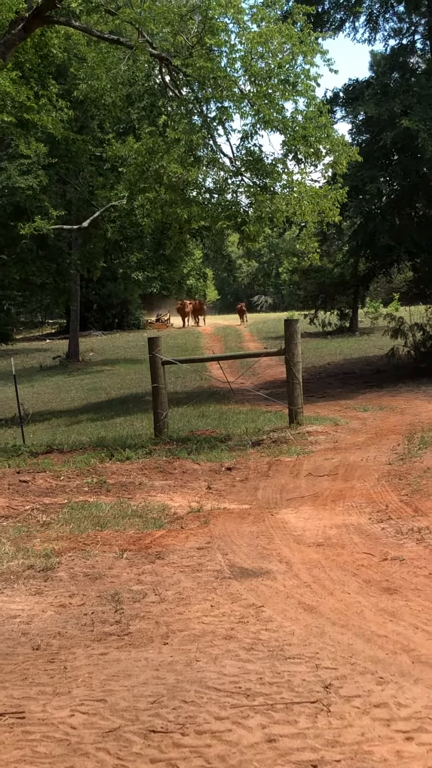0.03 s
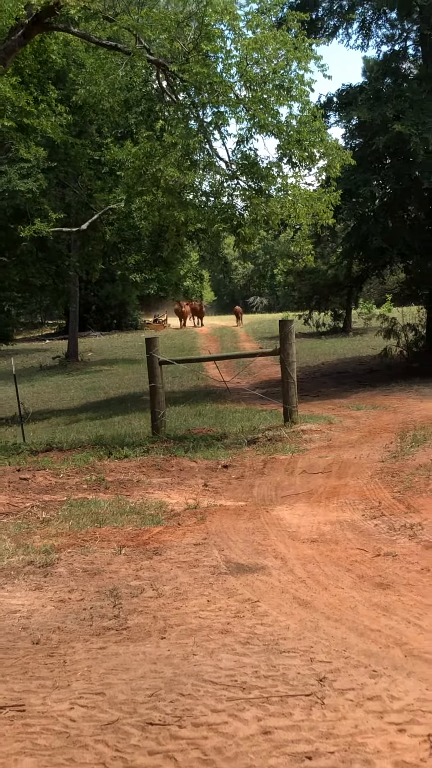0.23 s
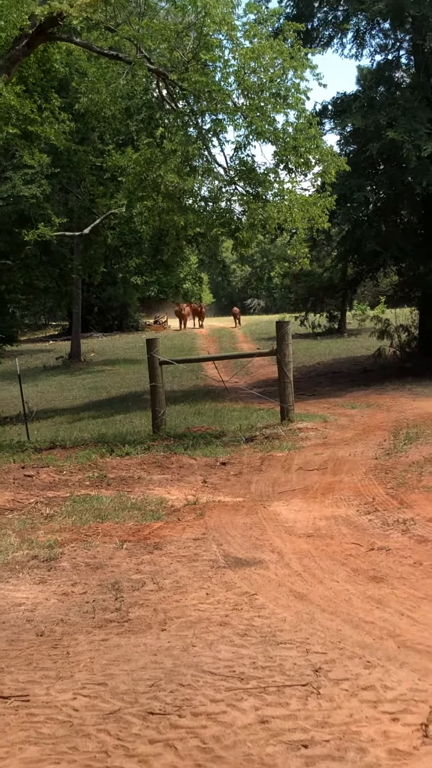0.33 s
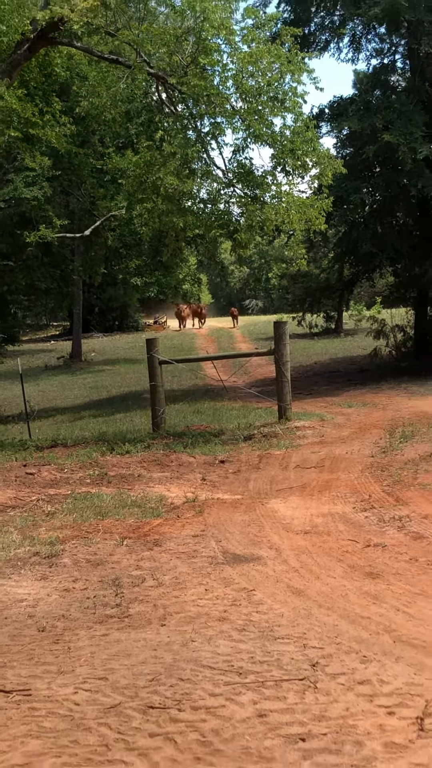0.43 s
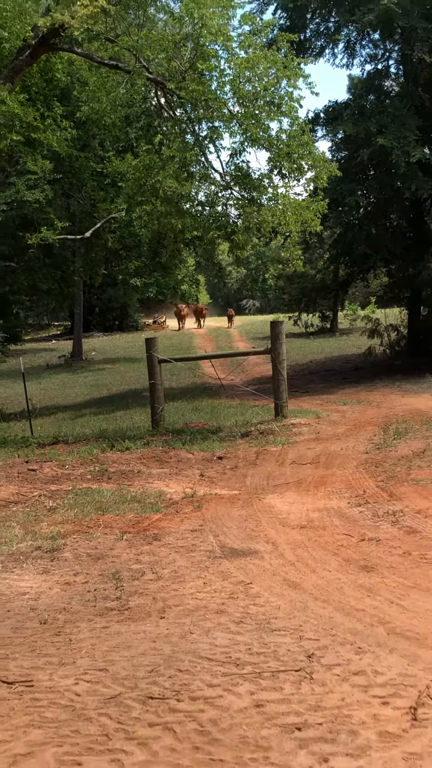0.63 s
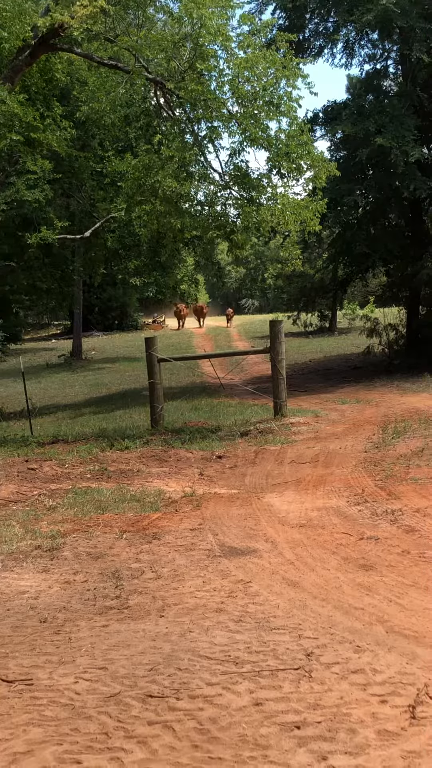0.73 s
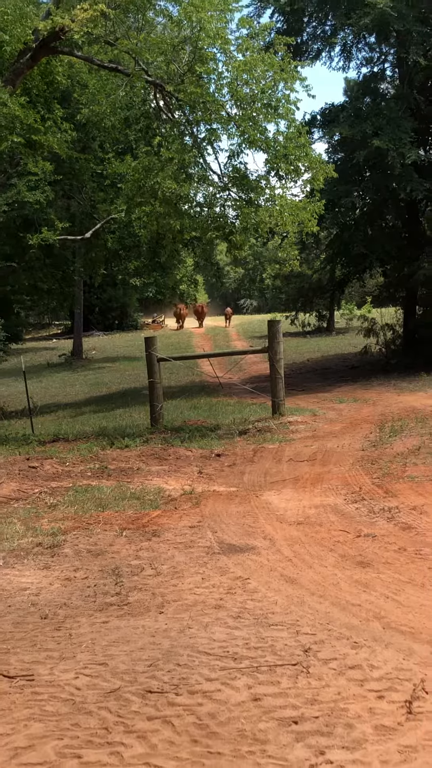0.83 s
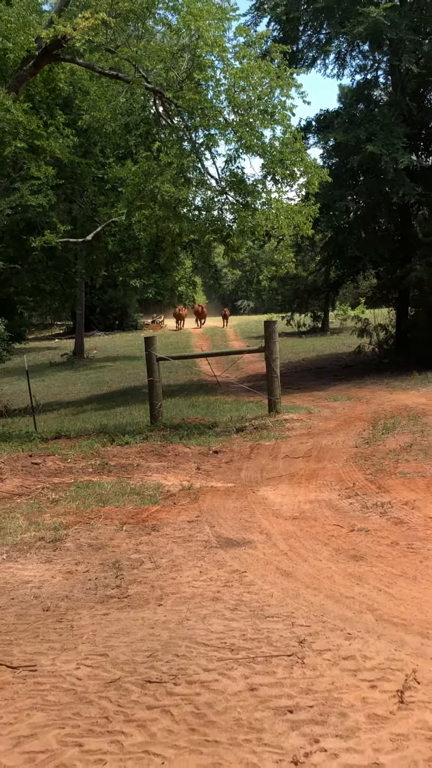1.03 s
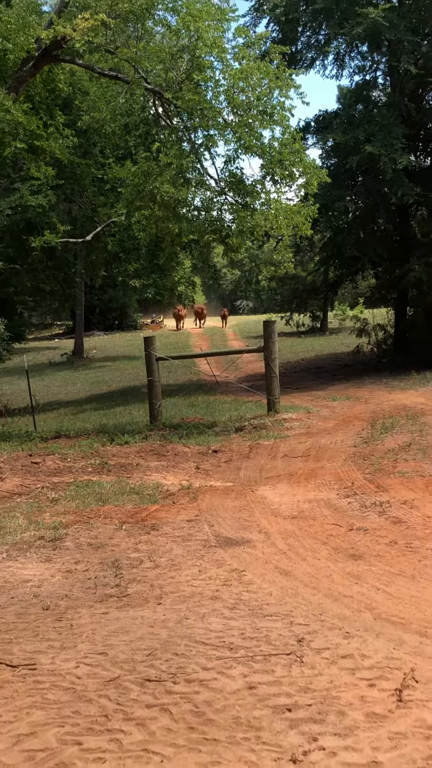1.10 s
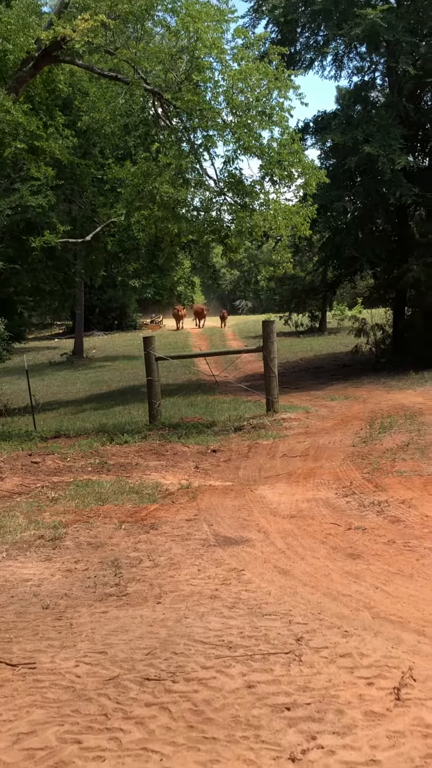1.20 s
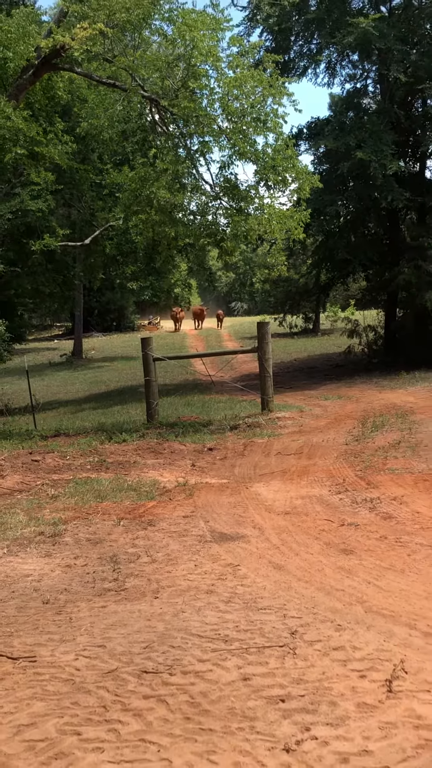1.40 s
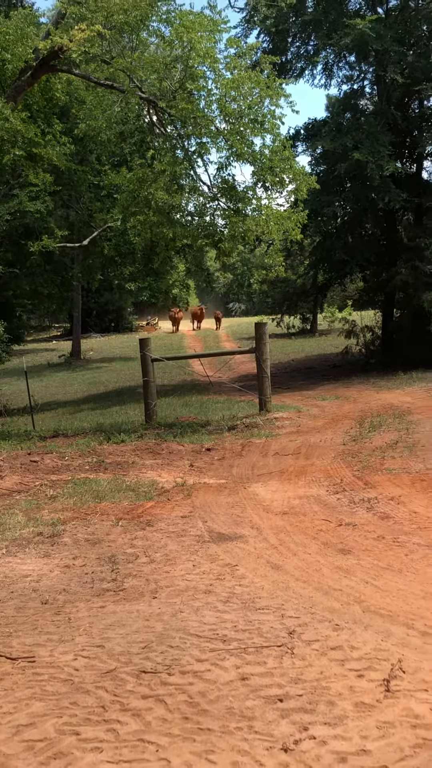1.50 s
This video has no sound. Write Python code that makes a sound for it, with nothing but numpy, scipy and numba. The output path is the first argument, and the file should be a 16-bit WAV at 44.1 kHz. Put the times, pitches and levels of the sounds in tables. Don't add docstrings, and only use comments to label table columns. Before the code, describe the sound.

A cow's moo begins creaky, low and muffled, opens at about 0.2 s, and swells into a full nasal bellow climbing in pitch until 0.95 s. Near 0.98 s it breaks into a thin squeal that slides down, wobbles and dies by 1.35 s. Dull faint tree echoes follow. Leaf hiss, insects, a distant engine drone, breeze rumble and scattered dry ticks stay quiet underneath, with several ticks after 1.3 s.

```python
import sys
import numpy as np
from scipy import signal
from scipy.io import wavfile
from scipy.ndimage import uniform_filter1d
from numba import njit

SR = 44100
rng = np.random.default_rng(int(sys.argv[2]) if len(sys.argv) > 2 else 0)


def put_to_file(sound):
    columns = np.atleast_2d(sound).T
    safe = np.clip(columns, -1, 1)
    whole_steps = np.round(safe * 32767)
    wavfile.write(sys.argv[1], SR, whole_steps.astype(np.int16))


def volts_from_db(level):
    exponent = np.asarray(level, float) / 20
    return 10 ** exponent


N = 68355
T = np.arange(N) / SR


def rms_one(x):
    return x / np.sqrt(np.mean(x ** 2) + 1e-20)


def in_time(rows):
    s, *columns = np.transpose(rows)
    return [np.interp(T, s, c) for c in columns]


def band(x, low_hz, high_hz, order=2):
    edges_hz = [low_hz, min(high_hz, .45 * SR)]
    return signal.sosfilt(signal.butter(order, edges_hz, "band", fs=SR, output="sos"), x)


def noise_band(center_hz, width_hz, x):
    return rms_one(band(x, center_hz - width_hz / 2, center_hz + width_hz / 2))


def drift(rate_hz):
    r = np.exp(-2 * np.pi * rate_hz / SR)
    wander = signal.lfilter([1], [1, -2 * r, r * r], rng.standard_normal(N + SR))
    return rms_one(wander[SR:])


# [t/s, f/Hz]
CHEST_HZ = [(0.0, 96.4), (0.038, 87.28), (0.184, 90.52), (0.29, 82.93), (0.354, 87.93), (0.444, 95.2),
            (0.54, 105.8), (0.62, 114.8), (0.79, 131.9), (0.855, 137.2), (0.88, 148.7), (.944, 153.1),
            (0.98, 160.2)]
# [t/s, level/dB, lowest tone/dB]
EFFORT = [(0, -48.5, 2), (.152, -51.5, -9), (0.162, -43.5, -11), (0.256, -39, -19), (.33, -34.5, -23.5),
          (.45, -32.5, -19), (.54, -32, -22.5), (.7, -30, -15), (0.808, -29, -11), (.835, -35, -9),
          (0.86, -33.5, -5), (0.881, -35, -4), (.94, -40, -0.5), (.965, -38, -2)]
# [t/s, roughness/0-1]
ROUGH = [(0, .6), (.14, .5), (.17, .1), (.3, .04), (.735, .05), (.755, .9), (.778, .2), (.81, .3),
         (.84, .7), (.885, .3), (.93, .3), (.965, .9)]
# [t/s, shape: 0 murmur, 1 shut, 2 open, 3 wide, 4 rounded, 5 tense, 6 slack]
MOUTH = [(0, -0.5), (.15, 0.5), (0.163, 1), (0.246, 0.9), (0.271, 2), (.36, 2.5), (0.5, 3), (.545, 3),
         (0.62, 4), (.72, 4.5), (.8, 4), (.87, 5), (.96, 4.5)]
# [t/s, level/dB]
CATCHES = [
    (.003, 2.1),
    (0.036, 4.3),
    (0.089, 7.1),
    (.111, 3.6),
]
CATCH_S = 0.024
BREAK_S, BREAK_FADE_S = .978, .014
EDGE_HZ, EDGE_SCATTER_DB, EDGE_AIR, TOP_HZ = 1350, .7, .16, 4800


def chest_voice():
    hz, = in_time(CHEST_HZ)
    db, lowest_db = in_time(EFFORT)
    rough, = in_time(ROUGH)
    mouth, = in_time(MOUTH)
    for s, d in CATCHES:
        db = db + d * (T > s) * np.exp(-np.abs(T - s) / CATCH_S)
    jitter = .04 * rough * drift(50) + .0015 * drift(80)
    phase = np.cumsum(hz * (1 + jitter)) / SR

    strength, sharpness = rng.standard_normal((400, 2))[(phase + .5).astype(int)].T
    k = np.arange(2, 50)[:, None]
    weight = np.where(k * hz < EDGE_HZ, 1, volts_from_db(EDGE_SCATTER_DB * sharpness)) * (k * hz < TOP_HZ)
    puffs = (np.cos(2 * np.pi * k * phase) * weight).sum(axis=0) * volts_from_db(5 * rough * strength)

    gate = np.exp(-4 * (phase % 1))
    air = gate * rng.standard_normal(N)
    breath_gain = .04 + rough * np.where(T > .3, 1.1, .4)
    breath = breath_gain * rms_one(band(air, 350, TOP_HZ))
    breath = breath + (EDGE_AIR + .3 * rough) * rms_one(band(air, EDGE_HZ, TOP_HZ))

    voice = throat(rms_one(puffs) + breath, mouth, direct_db=-80)
    voice = voice - volts_from_db(lowest_db) * np.sin(2 * np.pi * phase)
    fade = np.clip((BREAK_S - T) / BREAK_FADE_S, 0, 1)
    return volts_from_db(db) * fade * (voice + rasp(air * gate))


# [t/s, length/s, f/Hz, level/dB]
RASPS = [
    (.08, 0.09, 6700, -24.5),
    (0.604, 0.028, 6200, -40),
    (0.65, .02, 6200, -40),
    (0.66, 0.047, 8000, -39),
    (.76, 0.035, 7900, -41.5),
    (0.813, .006, 6440, -34),
    (.89, .055, 6300, -33.5),
    (0.886, 0.046, 7200, -35),
]


def rasp(gated_air):
    out = 0
    for s, length_s, hz, db in RASPS:
        swell = np.exp(-((T - s) / length_s) ** 2)
        out = out + volts_from_db(db) * swell * noise_band(hz, 270, gated_air)
    return out


# [t/s, f/Hz]
SQUEAL_HZ = [(.96, 640), (.982, 559), (1.05, 554.5), (1.102, 537.4), (1.152, 472.8), (1.186, 395.6),
             (1.22, 305), (1.24, 245), (1.252, 191), (1.26, 266.4), (1.3, 283.6), (1.33, 275), (1.36, 238)]
# [t/s, level/dB, breath/dB, overtones/dB]
SQUEAL_DB = [(0.959, -42, -23.5, 2), (1.06, -45, -24, -1), (1.104, -41.5, -30.5, -1),
             (1.18, -47.5, -21, 2.5), (1.207, -38, -18, 5), (1.222, -31, -27, -4), (1.232, -30, -28, -2),
             (1.25, -34, -23, -21), (1.262, -38, -19.5, -5), (1.279, -40, -11, -1), (1.295, -49, -30, -1),
             (1.338, -47.5, -34, -7), (1.349, -58, -24, -8)]
SQUEAL_TONES_DB = [1.2, -5, -4, -10, -12.5, -7]


def squeal():
    hz, = in_time(SQUEAL_HZ)
    db, breath_db, bright_db = in_time(SQUEAL_DB)
    phase = np.cumsum(hz * (1 + 0.0044 * drift(25.4))) / SR
    tone = 0
    for k, tone_db in enumerate(SQUEAL_TONES_DB, start=1):
        level_db = tone_db + (k > 1) * bright_db + 1.2 * drift(29)
        tone = tone + volts_from_db(level_db) * np.cos(2 * np.pi * k * phase)
    air = band(rng.standard_normal(N), 200, 4000)
    voice = throat(tone + volts_from_db(breath_db) * 20 * air, np.full(N, 6.), direct_db=-32.5)
    start_s, end_s = SQUEAL_DB[0][0], SQUEAL_DB[-1][0]
    on = np.clip(np.minimum(T - start_s, end_s - T) / .008, 0, 1)
    return volts_from_db(db) * on * voice


# [f/Hz, width/Hz, level/dB]
MURMUR = [(277, 32, 0), (610, 190, -21.5), (950, 91, -6), (1350, 81, -36), (1630, 86, -16.5),
          (2040, 98, -17.5), (2340, 130, -17), (2995, 110, -19), (3700, 110, -20.5)]
SHUT = [(196, 65, -8.5), (702, 370, -8.5), (890, 92, 1), (1237, 20, -23), (1570, 79, -17), (2030, 88, -4.5),
        (2400, 99, -10.5), (2970, 79, -23.5), (3600, 68, -21.5)]
OPEN = [(213, 77, -1.5), (557, 150, -10), (1029, 66, -1), (1267, 37, 0.5), (1575, 81, -9.5), (1986, 71, -3),
        (2390, 130, -7), (2964, 53, -9), (3560, 71, -14)]
WIDE = [(224, 38, 6.5), (596, 63, -1.5), (1036, 59, -1), (1280, 62, -13.5), (1540, 64, -19), (1842, 51, -7),
        (2310, 150, -18.5), (2860, 70, -15), (3580, 220, -38.5)]
ROUND = [(245, 15.7, 10), (620.3, 68, -3), (1030, 68, -3), (1296, 106, -17), (1585, 79, -12.5),
         (1828, 52, -23), (2130, 120, -27), (2810, 134, -21), (3540, 200, -33)]
TENSE = [(280.5, 17, 1), (637, 58, -5), (1040, 59, -8), (1326, 94, -26.5), (1533, 76, -18.5),
         (1828, 26, -15.5), (2400, 170, -31), (2737, 150, -24), (3350, 89, -35)]
SLACK = [(275, 70, -0.5), (599, 120, -4.5), (1038, 95, -2.5), (1330, 89, -20), (1583, 124, -10.5),
         (1841, 47, -15.5), (2480, 87, -33), (2766, 170, -16.5), (3300, 170, -19.5)]
POLARITY = [1, 1, -1, 1, 1, 1, -1, -1, -1]
# [f/Hz, width/Hz, depth/0-1]
HOLLOWS = [(417, 110, 0.91), (830, 280, 0.4), (1740, 25, 0.8), (2180, 690, 0.61), (2613, 120, 0.72),
           (4300, 1600, 0.48)]


def throat(source, mouth, direct_db):
    shapes = np.transpose([MURMUR, SHUT, OPEN, WIDE, ROUND, TENSE, SLACK], (1, 2, 0))
    out = 0
    for sign, resonance in zip(POLARITY, shapes):
        hz, width_hz, db = [np.interp(mouth, np.arange(7), row) for row in resonance]
        gain = sign * volts_from_db(db + .8 * drift(9.6))
        out = out + gain * resonate(source, hz, width_hz, SR)
    for hz, width_hz, depth in HOLLOWS:
        out = out - depth * resonate(out, np.full(N, float(hz)), np.full(N, float(width_hz)), SR)
    out = out + volts_from_db(direct_db) * source
    return out / np.sqrt(uniform_filter1d(out ** 2, size=1400) + 1e-12)


@njit
def resonate(x, hz, width_hz, sr):
    y = np.zeros(len(x))
    for i in range(2, len(x)):
        r = np.exp(-np.pi * width_hz[i] / sr)
        drive = (1 - r * r) / 2 * (x[i] - x[i - 2])
        y[i] = drive + 2 * r * np.cos(2 * np.pi * hz[i] / sr) * y[i - 1] - r * r * y[i - 2]
    return y


# [delay/s, level/dB]
ECHOES = [(.012, -22), (.037, -20), (.071, -24), (.118, -29)]


def tree_line(call):
    dull = band(call, 73, 1800, order=1)
    return sum(volts_from_db(db) * np.interp(T - s, T, dull, left=0) for s, db in ECHOES)


# [t/s, peak/dB, low f/Hz, high f/Hz]
TICKS = [(.017, -38.5, 5600, 8100), (0.177, -41.5, 2500, 9900), (0.4395, -34.5, 4400, 12400),
         (.664, -47, 6080, 15240), (1.2767, -44, 400, 4170), (1.345, -49.5, 500, 4500),
         (1.374, -46.5, 2300, 6000), (1.4198, -39, 2980, 9900), (1.442, -61, 1490, 7960),
         (1.46, -43, 1180, 4800), (1.4878, -49.5, 1980, 6120)]


def ticks():
    out, t = np.zeros(N + SR), np.arange(400) / SR
    for s, peak_db, low_hz, high_hz in TICKS:
        burst = rng.standard_normal(400) * np.exp(-t / .0012)
        snap = band(burst, low_hz, high_hz)
        i = int(s * SR)
        out[i:i + 400] += volts_from_db(peak_db) * snap / np.abs(snap).max()
    return out[:N]


# [t/s, length/s, level/dB]
RUSTLES = [
    (0.068, 0.071, -62),
    (0.949, 0.062, -67.5),
    (1.093, 0.088, -66),
    (1.436, 0.075, -69),
]


def rustles():
    swell = sum(volts_from_db(db) * np.exp(-((T - s) / length_s) ** 2) for s, length_s, db in RUSTLES)
    noise = rms_one(band(rng.standard_normal(N), 7000, 9500, order=1))
    return swell * volts_from_db(2.1 * drift(73)) * noise


# [f/Hz, density/dB per Hz]
AIR = [(150, 9), (270, 0), (420, -8), (700, -5.5), (1500, -12), (3000, -16.5), (7000, -19), (15500, -23)]
AIR_DB, AIR_START_DB, AIR_SETTLE_S = -62, 11.5, 1


def leaf_hiss():
    edges_hz = 150 * 2 ** np.arange(0, 7.1, .5)
    white = rng.standard_normal((2, N))
    hz, db = np.transpose(AIR)
    together = drift(16)
    hiss = 0
    for k, (low_hz, high_hz) in enumerate(zip(edges_hz, edges_hz[1:])):
        level_db = np.interp(np.log(low_hz * high_hz) / 2, np.log(hz), db)
        flicker_db = 1.2 * together + 1.3 * drift(14)
        hiss = hiss + volts_from_db(level_db + flicker_db) * band(white[k % 2], low_hz, high_hz)
    return volts_from_db(AIR_DB + AIR_START_DB * np.exp(-T / AIR_SETTLE_S)) * rms_one(hiss)


def insects():
    out = 0
    for hz, width_hz, db in [(4650, 280, -71.5), (4000, 900, -69.5)]:
        out = out + volts_from_db(db + drift(66)) * noise_band(hz, width_hz, rng.standard_normal(N))
    return out


# [f/Hz, level/dB]
DRONE = [(91, -65.5), (183, -67.5), (277, -82)]


def engine_drone():
    return sum(np.sqrt(2) * volts_from_db(db + 0.63 * drift(1.75)) * np.sin(2 * np.pi * hz * T) for hz, db in DRONE)


# [t/s, level/dB]
BREEZE = [(0.0, -78), (0.02, -51), (0.056, -48), (0.188, -57), (0.228, -51.5), (0.302, -50), (0.358, -69),
          (.43, -66), (.462, -48), (.5, -55), (0.538, -49), (0.568, -67), (0.742, -46), (0.8, -82),
          (1.1, -65), (1.155, -60), (1.2, -56), (1.25, -55), (1.346, -85), (1.372, -64), (1.51, -66),
          (1.55, -54)]


def breeze():
    db, = in_time(BREEZE)
    return volts_from_db(db + 2 * drift(12)) * rms_one(band(rng.standard_normal(N), 48, 125))


def scene():
    cow = chest_voice() + squeal()
    near = ticks() + rustles()
    pasture = leaf_hiss() + insects() + engine_drone() + breeze()
    return (cow + tree_line(cow) + near + pasture)[None, :]


def top_cut(x):
    return signal.sosfilt(signal.butter(12, 15720, fs=SR, output="sos"), x)


def record(dry):
    low_pass = signal.ellip(12, .5, 70, 15700, fs=SR, output="sos")
    mix = signal.sosfilt(low_pass, dry)
    return top_cut(mix)


dry = scene()
out = record(dry)
put_to_file(out)
```